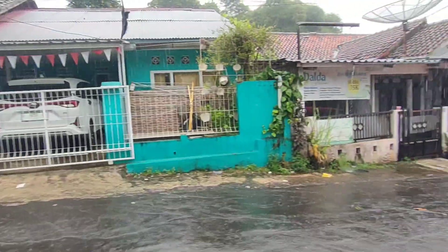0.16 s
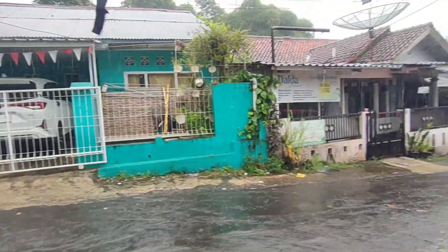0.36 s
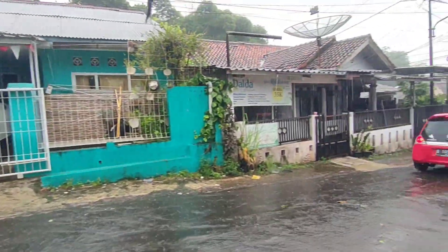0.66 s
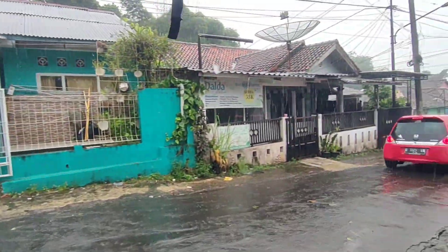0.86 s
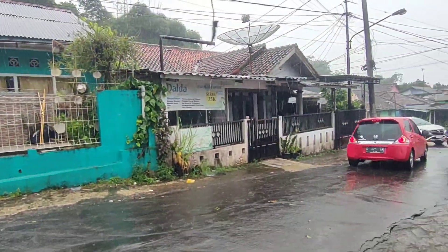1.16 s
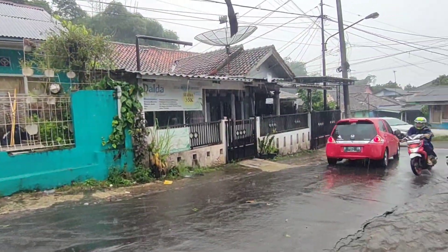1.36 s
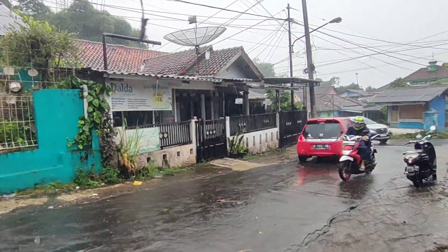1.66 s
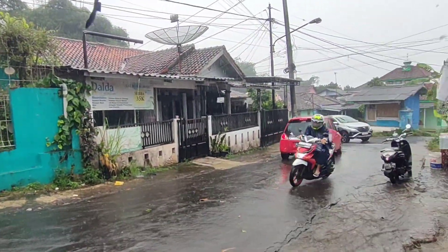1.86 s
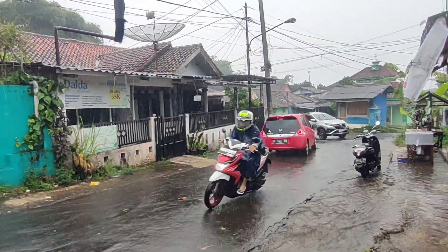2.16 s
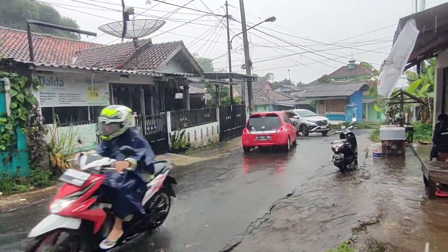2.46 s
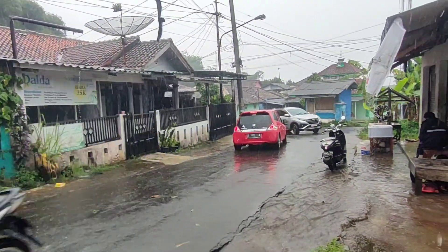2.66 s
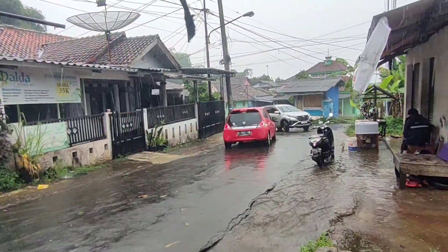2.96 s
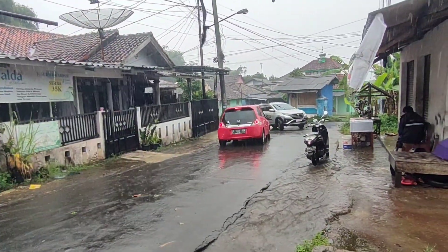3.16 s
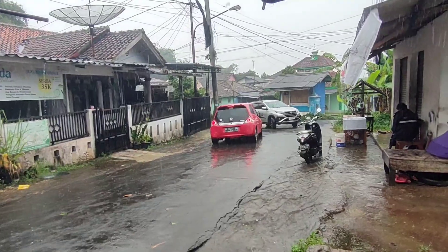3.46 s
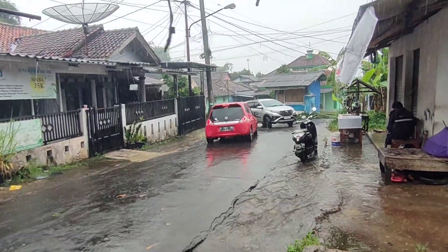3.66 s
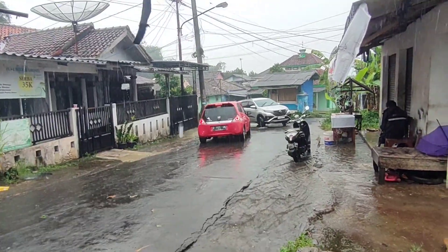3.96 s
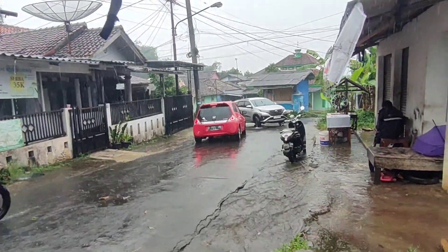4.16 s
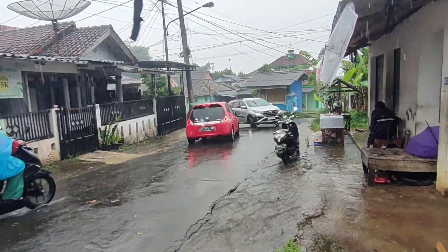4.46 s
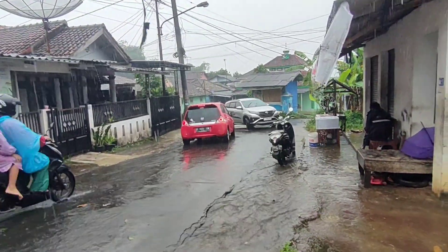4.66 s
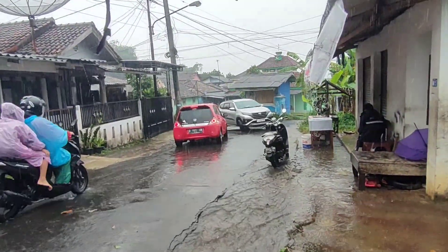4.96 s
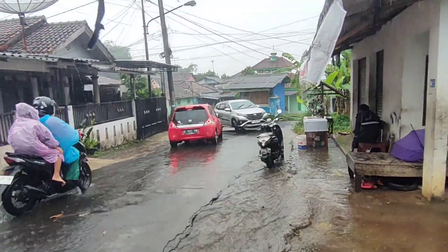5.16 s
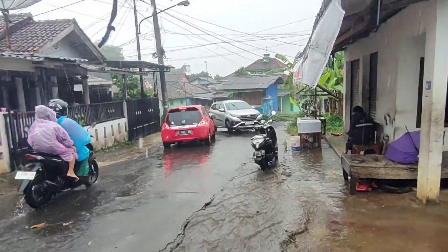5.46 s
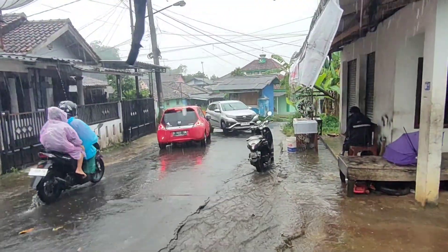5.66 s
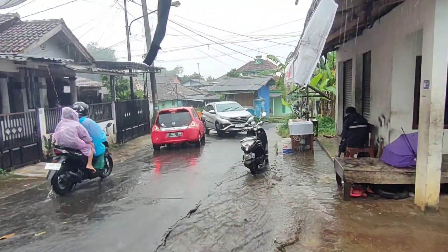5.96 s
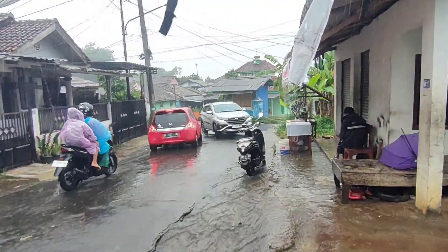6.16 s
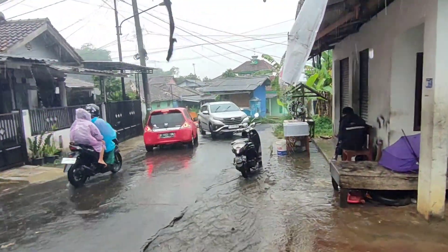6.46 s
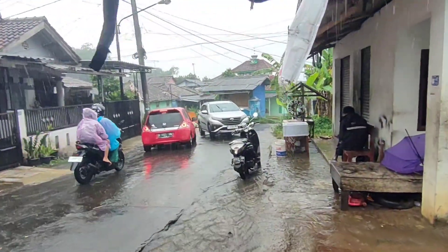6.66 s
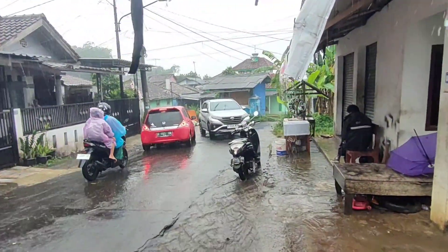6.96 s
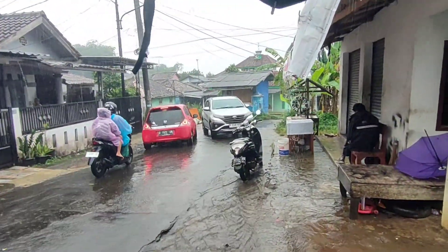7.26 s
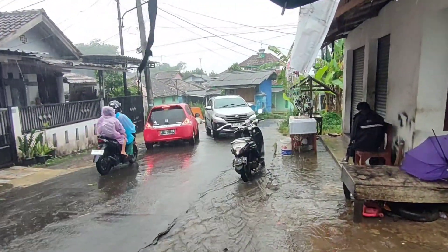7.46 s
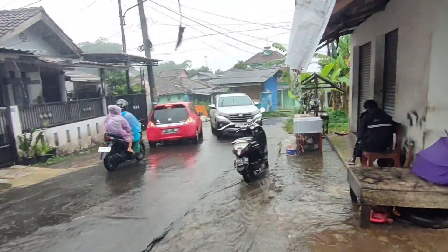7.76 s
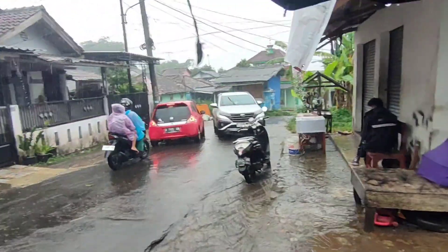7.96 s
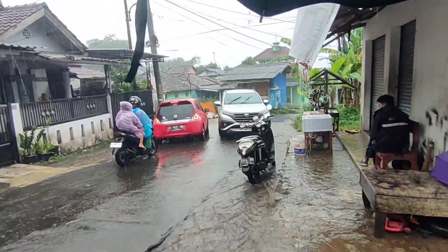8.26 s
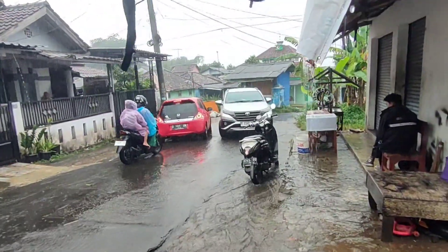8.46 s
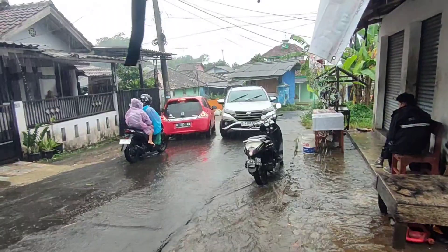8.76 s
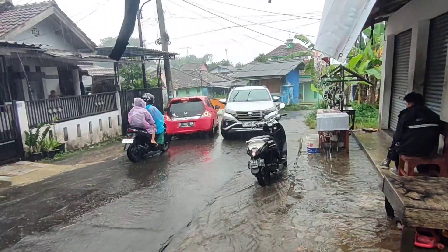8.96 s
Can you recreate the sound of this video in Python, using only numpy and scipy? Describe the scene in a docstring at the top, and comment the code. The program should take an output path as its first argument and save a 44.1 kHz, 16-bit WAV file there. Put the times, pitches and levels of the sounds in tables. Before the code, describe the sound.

Rain fills a wet village road, heard on a phone from a sheltered porch; the hiss is patchy, with clumped light drops, and a few plinks hit the awning around 0.3-0.6 s. From about 1 s a scooter's low, uneven putter grows with wet tyre spray, passing closest near 2.9 s with a brief ringing boom. Its exhaust drops in pitch and dies by 4.5 s, while a second engine idles steadily, weakening to almost nothing by 9 s. Rain is strongest near 3 s, then eases. Small birds warble from 3.1 to 4.3 s, chirp strongly at 4.4-4.8 s, then more sparsely, at 6.5 and 8.5 s, with a faint trailing whistle at 8.9 s. Very thin brake squeaks come near 4.3, 6.2 and 6.5 s. Large drops thud overhead from 4.8 to 6.2 s and knock or plink again at 7.6-8 s. Short porch reverberation; right side muffled.

```python
"""Rain on a wet village road, heard from a porch: a scooter speeds up, passes close by, slows and leaves, tyres
spray; a second one idles on, fading. Exhausts are sine multiples of a firing rate, tyres and rain wash are hiss.
Drops knock on the awning overhead as pitched blows; small birds chirp and warble under the porch roof as
gliding partials; a brake squeaks thinly as swelling tones.
The phone has two ports; the right one is shaded and hears little treble."""
import sys
import numpy as np
from scipy import signal
from scipy.fft import rfft, irfft, next_fast_len
from scipy.io import wavfile
from scipy.ndimage import uniform_filter1d, minimum_filter1d, map_coordinates

SR = 44100
rng = np.random.default_rng(int(sys.argv[2]) if len(sys.argv) > 2 else 0)


def materialize(psi):
    """Save the field psi as 16-bit PCM at rate SR to the path in sys.argv[1].

    A 1-D psi becomes a single channel; in a 2-D psi each row is a channel.
    """
    bounded = np.clip(np.atleast_2d(psi).T, -1, 1)
    quanta = np.round(bounded * 32767).astype(np.int16)
    wavfile.write(sys.argv[1], SR, quanta)


def elevation(decibels):
    """Turn decibel levels (scalar or array-like) into linear amplitude ratios."""
    levels = np.asarray(decibels, float)
    return 10 ** (levels / 20)


N = 401310
T = np.arange(N) / SR
SIDES = np.array([[1], [-1]])  # left port, right port

# sound common to both ports: (frequency [Hz], correlation [0 to 1])
PORT_LIKENESS = [(130, 1), (300, 0.54), (900, 0.15)]
# treble kept from the right port: (frequency [Hz], loss [dB])
RIGHT_PORT_SHADE = [(550, 1.5), (1400, 13.5), (3300, 8.5), (7000, 114), (10000, 63.5), (15000, 42.5)]
TOP_HZ = 15850
PORCH_T60_S = 0.43

# colour of the rain wash and of the drop splats: (frequency [Hz], spectral level [dB])
RAIN_COLOUR = [(30, -9.5), (98, 1), (295, -5.5), (666, -5), (1010, -22.5), (1280, -14.5), (2900, -36),
               (4080, -38), (6550, -26), (8600, -42), (11500, -51), (14800, -28)]
WASH_DB = -46.5  # before the shower strength
# strength of the wash and the patter, rising and then easing: (time [s], level [dB])
SHOWER = [(0, 8.5), (3, 12.5), (6.5, 4.5), (9.1, 3)]
# big drops on the awning: (time [s], blow level before the awning rings [dB], blow pitch [Hz])
BIG_DROPS = [(0.323, -28.5, 1520), (0.473, -25, 1496), (0.534, -37.5, 706), (0.572, -31, 1200),
             (4.841, -21.5, 260.6), (4.926, -23.5, 260.2), (5.348, -19.5, 313.4), (5.463, -23.5, 389),
             (5.625, -26, 1190), (5.664, -25.5, 353), (5.792, -21, 352), (6.212, -28.5, 574),
             (7.609, -23.5, 1948), (7.735, -30, 594), (7.81, -37.5, 1320), (8.027, -23.5, 1240)]
# ringing modes of the awning: (frequency [Hz], level [dB], decay by 60 dB [s])
AWNING_MODES = [(189, -6.5, 0.083), (619, -4, 0.016), (1342, -12.5, 0.029), (1927, -17, 0.048),
                (2510, -26.5, 0.083)]

# single chirps: (start [s], swell [s], fade [s], peak level [dB],
#                 second partial near the peak [Hz], drift after the peak [Hz/s])
CHIRPS = [(3.544, 0.0095, 0.044, -15, 6910, -1500), (4.345, 0.055, 0.022, -9, 6652, 1491),
          (4.512, 0.024, 0.064, -12, 6733, 4189), (4.986, .012, 0.022, -26.5, 6900, -5000),
          (5.195, 0.091, 0.082, -24, 5940, 7005), (6.022, 0.015, 0.019, -30.5, 6304, -500),
          (6.044, 0.0075, 0.027, -34.5, 7050, -4000), (6.541, 0.056, 0.016, -12.5, 6648, -100),
          (6.859, 0.037, 0.0203, -21, 6780, -2000), (7.05, 0.09, 0.034, -31, 6090, 474.5),
          (8.545, 0.043, 0.11, -17, 6818, -500), (8.911, 0.027, 0.69, -29, 6286, 1604)]
# notes drawn point by point, one list each, warbles and one steep falling chirp:
# (time [s], second partial [Hz], level [dB])
DRAWN_NOTES = [
    [(3.06, 6560, -29), (3.165, 6790, -28), (3.225, 6780, -19.5), (3.24, 7130, -23.5), (3.31, 7150, -22),
     (3.36, 6500, -19)],
    [(3.408, 8020, -31), (3.425, 7400, -14.5), (3.447, 6880, -21), (3.472, 6450, -17)],
    [(3.6, 6510, -21.5), (3.618, 6930, -11.5), (3.632, 6760, -18), (3.675, 6600, -21), (3.692, 7250, -10.5),
     (3.716, 7460, -27), (3.752, 6670, -10.5), (3.775, 5766, -22.5)],
    [(4.1, 7000, -28), (4.148, 6350, -20), (4.175, 7080, -15), (4.204, 6800, -17.5), (4.252, 6220, -11),
     (4.29, 6250, -26)],
    [(4.703, 7630, -31.5), (4.716, 6950, -16), (4.745, 7180, -17), (4.764, 7020, -13), (4.796, 6800, -14.5),
     (4.83, 6600, -51.5)],
]
# strength of any whistle partial by its pitch: (frequency [Hz], level [dB])
WHISTLE_COLOUR = [(3450, -9), (7200, 0), (8000, -38), (9000, -18), (10500, -23), (12000, -46),
                  (14000, -24.5)]
SWELL_DB, FADE_DB = 16, 10.5  # a chirp's level below its peak at the start and at the end
# stronger chirps start higher and drop in during the swell
SCOOP_HZ_PER_DB, SCOOP_FROM_DB, SCOOP_SHARE = 30, -41, 0.25
BRIGHTER_DB_PER_DB, PLAIN_DB = 0.45, -20.5  # louder notes favour the upper partials

# brake squeaks: (start [s], peak level [dB], swell time [s])
SQUEAKS = [(4.339, -25.5, 0.011), (6.203, -22, 0.026), (6.52, -32, 0.015)]
SQUEAK_HZ = 9085

# the first scooter's exhaust as it slows and leaves: (time [s], firing rate [Hz], level [dB])
LEAVING = [(3.002, 46.27, -24.5), (3.598, 40.96, -37.5), (4.248, 33.57, -35), (4.553, 30.3, -54)]

# exhaust as heard, a scooter passes, then a second one idles on near 46 Hz:
# (time [s], firing rate [Hz], level [dB])
ENGINES = [(0.6, 32, -50), (1.338, 43.24, -29.5), (1.54, 45.65, -31), (2.33, 45.42, -25.5),
           (3.198, 46.06, -25), (4.25, 47.1, -30.5), (4.7, 48.6, -35), (4.871, 46.67, -41.5),
           (7.1, 45.47, -45.5), (9.1, 45.4, -100)]
# relative strength of multiples 2 to 9 of the firing rate: (level [dB])
EXHAUST_DB = [6.5, -5, 1.5, 0.5, -1, -3.5, -7.5, -10]
# resonances near the pass, the casing rings, and a boom at the exhaust's third multiple:
# (frequency [Hz], width [Hz], relative level [dB]); in effect no wider than about 1100 Hz
PASS_RESONANCES = [(867.3, 16.5, 10), (959, 26, 7), (1930, 3100, -10.5), (140, 26, 11), (564, 31, -1.5)]
# the resonances are heard only near the closest point of the pass
PASSES_S, NEAR_S, RESONANCE_DB, RESONANCE_DB_PER_DOUBLING = 2.89, 0.28, -22.5, 12.5
# colour of the tyre spray: (frequency [Hz], spectral level [dB])
SPRAY_COLOUR = [(842, -16), (2000, -13), (3700, -34), (6520, -11), (8360, -28.5), (16000, -32)]
# tyre spray as heard: (time [s], level [dB])
TYRES = [(1.0, -47), (1.54, -34), (2.33, -24.5), (2.85, -23), (3.3, -33), (4.9, -59.5)]


def unit_rms(x):
    """Scale to an rms of 1, over both ports together."""
    return x / np.sqrt(np.mean(x ** 2))


def over_hz(table, hz):
    """Read (frequency, value) points on a log axis."""
    f, v = np.transpose(table)
    return np.interp(np.log(hz + 1), np.log(f), v)


def walk(rate, count=1):
    """Random wander in straight lines between `rate` knots per second, spread near 1."""
    knots = rng.standard_normal((count, int(N / SR * rate) + 2))
    return np.array([np.interp(T * rate, np.arange(len(k)), k) for k in knots])


def ring(x, hz, t60):
    """One mode, struck by x and decaying exponentially."""
    p = np.exp(2j * np.pi * hz / SR - np.log(1000) / (max(t60, .002) * SR))
    return signal.lfilter([0, p.imag], [1, -2 * p.real, abs(p) ** 2], x)


def hiss(colour, patchy_db, patch_hz, patch_s, per_s):
    """Two-port noise made of splashes: each strikes a range of pitch at once and fades; the bass is shared."""
    hz = np.fft.rfftfreq(512, 1 / SR)
    frames = N // 128 + 5
    u = rng.random((2, 33, frames))
    strikes = -np.log(1 - u[0]) * (u[1] < per_s * 128 / SR)
    fading = signal.lfilter([1], [1, -np.exp(-128 / SR / max(patch_s, .005))], strikes, axis=1)
    warp = 5.2 * np.log2(1 + hz / patch_hz)  # splashes widen with pitch
    at = np.meshgrid(warp, np.arange(frames), indexing="ij")
    splash = map_coordinates(fading[1:], at, order=1, mode="nearest")
    splash = splash + 0.12 * fading[0]  # some strike every pitch
    # the top hisses more evenly
    depth_db = patchy_db * (np.clip(hz / 900, .3, 1.3) / np.sqrt(1 + hz / 5000))[:, None]
    patches = elevation(depth_db * np.log2(0.27 + splash))
    noise = rng.standard_normal((2, len(hz), frames, 2)) @ np.array([1, 1j])
    mid, side = signal.istft(patches * noise, nperseg=512, noverlap=384)[1][:, :N]

    size = next_fast_len(N)
    hz = np.fft.rfftfreq(size, 1 / SR)
    like = np.clip(over_hz(PORT_LIKENESS, hz), 0, 1)
    pair = np.sqrt(1 + like) * rfft(mid, size) + SIDES * np.sqrt(1 - like) * rfft(side, size)
    return unit_rms(irfft(pair * elevation(over_hz(colour, hz)), size)[:, :N])


def porch(x, wet_db):
    """Walls and roof answer with a decaying haze, different at each port."""
    t = T[:int(.6 * SR)]
    tail = rng.standard_normal((2, len(t))) * np.exp(-np.log(1000) * t / PORCH_T60_S)
    tail *= t > .006  # the answer comes a little late
    tail = signal.lfilter([1], [1, -0.4], tail)  # duller than the direct sound
    tail /= np.sqrt(np.sum(tail ** 2, axis=1, keepdims=True))
    return x + elevation(wet_db) * signal.fftconvolve(x, tail, axes=1)[:, :N]


def knocks(drops, pan_db, splat_db, cycles_to_peak):
    """Each drop is a short pitched blow (thud if low, plink if high) ringing the awning, and a bright splat."""
    blows, splats = np.zeros((2, 2, N + SR))
    t = T[:1500]
    fade = np.exp(-t / 0.0052)
    for (s, db, hz), pan, cycles in zip(drops, pan_db, cycles_to_peak):
        i = int(s * SR)
        gain = elevation(db + SIDES * pan / 2)
        rise = t * hz / cycles
        blows[:, i:i + len(t)] += gain * rise * np.exp(1 - rise) * np.sin(2 * np.pi * hz * t)
        splats[:, i:i + len(t)] += gain * fade * hz / 1000  # high blows splash more
    size = next_fast_len(N)
    hz = np.fft.rfftfreq(size, 1 / SR)
    colour = elevation(over_hz(RAIN_COLOUR, hz) + splat_db) * (hz > 1000)
    splats = irfft(rfft(splats[:, :N] * rng.standard_normal(N), size) * colour, size)[:, :N]
    blows = uniform_filter1d(blows[:, :N], size=5)  # water cushions the edge
    rung = sum(elevation(db) * np.pi * f / SR * ring(blows, f, t60) for f, db, t60 in AWNING_MODES)
    return splats + blows + rung


def wash():
    """Far rain on road and roofs: countless splashes merge into a patchy hiss."""
    return elevation(WASH_DB) * hiss(RAIN_COLOUR, patchy_db=9.0, patch_hz=380.7, patch_s=0.034, per_s=22)


def patter():
    """Small drops come in clumps, each a faint knock with its own pitch and place."""
    clump, loud, pitch, place, delay, slow = rng.random((2400, 6)).T
    spills = rng.random(220) * N / SR
    when = spills[(clump * len(spills)).astype(int)] - .08 * np.log(1 - delay)
    hz = 350 * 2 ** (3 * pitch)
    drops = np.c_[when % (N / SR), -36 - 22 * loud ** .4, hz]
    cycles = 0.35 + slow ** 5 * hz / 700
    return porch(knocks(drops, pan_db=20 * (place - .5), splat_db=1.5, cycles_to_peak=cycles), wet_db=-10)


def awning_drops():
    """Big drops close overhead strike the awning, slightly louder at the left port."""
    count = len(BIG_DROPS)
    blows = knocks(BIG_DROPS, pan_db=np.full(count, 2.5), splat_db=14, cycles_to_peak=np.full(count, .33))
    return porch(blows, wet_db=-4.0)


def rain():
    """Wash and patter follow the shower's strength; the big drops keep their own levels."""
    strength = elevation(np.interp(T, *np.transpose(SHOWER)))
    return strength * (wash() + patter()) + awning_drops()


def chirp(start, swell, fade, db, hz, drift):
    """Pitch and level points of one chirp: it scoops down while swelling, then drifts and fades."""
    t = np.r_[np.linspace(0, swell, num=8), swell + fade]
    scoop = SCOOP_HZ_PER_DB * max(db - SCOOP_FROM_DB, 0) * np.exp(-t / (SCOOP_SHARE * swell))
    after = np.clip(t - swell, 0, None)
    level_db = db - SWELL_DB * np.clip(1 - t / swell, 0, 1) ** 2 - FADE_DB * after / fade
    return np.c_[start + t, hz + scoop + drift * after, level_db]


def birds():
    """Gliding, husky whistle: four partials, each wavering, and a breathy band between the lowest two."""
    hz, level_db = np.full(N, 6500.), np.full(N, -120.)  # silent between notes
    for note in DRAWN_NOTES + [chirp(*row) for row in CHIRPS]:
        s, f, db = np.transpose(note)
        on = slice(int(s[0] * SR), int(s[-1] * SR))
        hz[on] = np.interp(T[on], s, f)
        level_db[on] = np.interp(T[on], s, db)
    husk = 1 + 0.36 * walk(500)[0]
    waver_db = 2.2 * walk(60, count=4)
    phase = np.pi * np.cumsum(hz * (1 + 0.011 * walk(150)[0])) / SR  # of the lowest partial, at hz / 2
    tilt_db = BRIGHTER_DB_PER_DB * (np.clip(level_db, -40, 0) - PLAIN_DB)
    partials = np.zeros(N)
    for k in (1, 2, 3, 4):
        partial_db = over_hz(WHISTLE_COLOUR, k * hz / 2) + (k - 1.0) * tilt_db + waver_db[k - 1]
        partials += elevation(partial_db) * np.sin(k * phase)
    breath = elevation(-29) * walk(900)[0] * np.sin(3 * phase / 2)
    whistle = uniform_filter1d(elevation(level_db), size=160) * (husk * partials + breath)
    return porch(np.tile(whistle, (2, 1)), wet_db=-6.0)


def brake_squeaks():
    """Thin, nearly steady tones that swell and fade."""
    swells = np.zeros(N)
    for s, db, swell in SQUEAKS:
        t = np.clip(T - s, 0, None) / swell
        swells += elevation(db) * t * np.exp(1 - t)
    tone = np.sin(2 * np.pi * SQUEAK_HZ * np.cumsum(1 + .002 * walk(80)[0]) / SR)
    return porch(np.tile(swells * tone, (2, 1)), wet_db=-20)


def leaving_exhaust():
    """The first scooter slows and leaves: second and third multiples of its sinking firing rate die away."""
    s, hz, db = np.transpose(LEAVING)
    level_db = np.interp(T, s, db, left=-99, right=-99) + 0.99 * walk(0.7)[0]
    gain = uniform_filter1d(elevation(level_db), size=4000)
    phase = 2 * np.pi * np.cumsum(np.interp(T, s, hz)) / SR
    return gain * (np.sin(2 * phase) + elevation(-1.5) * np.sin(3 * phase))


def tyre_spray():
    """Wet tyres throw up water: finely patched hiss that swells and falls with the pass."""
    spray = hiss(SPRAY_COLOUR, patchy_db=1.5, patch_hz=650, patch_s=0.0042, per_s=61)
    return spray * elevation(np.interp(T, *np.transpose(TYRES)))


def pass_resonances(cycle):
    """Each firing, a knock and a gas rush, rings the casing and a low boom, loudest at the closest point."""
    fired = np.flatnonzero(np.diff(np.floor(cycle)))
    knock = 0.097 * rng.standard_normal((2, N)) * np.exp(-(cycle % 1) / .5)  # gas rush after each firing
    knock[:, fired] += elevation(0.79 * rng.standard_normal(len(fired)))
    knock = signal.oaconvolve(knock, np.hanning(16)[None], axes=1)[:, :N]  # soften the blow
    rung = sum(elevation(db) * w * ring(knock, f, np.log(1000) / np.pi / w) for f, w, db in PASS_RESONANCES)
    distance = np.hypot(1, (T - PASSES_S) / NEAR_S)  # 1 at the closest point
    return unit_rms(rung) * elevation(RESONANCE_DB - RESONANCE_DB_PER_DOUBLING * np.log2(distance))


def exhaust(cycle, pipe_db):
    """The pipe sounds low multiples of the firing rate, each wavering in level."""
    duller_db = 0.05 * (pipe_db - pipe_db.max())  # per multiple: the fainter, the duller
    wobble_db = 3.37 * walk(14, count=len(EXHAUST_DB))
    start = rng.random(len(EXHAUST_DB))
    pipe = np.zeros(N)
    for k, db in enumerate(EXHAUST_DB):
        gain = elevation(db + wobble_db[k] + k * duller_db)
        pipe += gain * np.sin(2 * np.pi * ((k + 2) * cycle + start[k]))
    return unit_rms(pipe) * elevation(pipe_db)


def scooters():
    """Slightly uneven single-cylinder firings, one curve for the scooter that passes and the one idling on."""
    s, *columns = np.transpose(ENGINES)
    hz, pipe_db = (np.interp(T, s, c) for c in columns)
    cycle = np.cumsum(hz * (1 + 0.00386 * walk(12)[0])) / SR
    return exhaust(cycle, pipe_db) + pass_resonances(cycle) + tyre_spray()


def scene():
    """Everything in front of the two ports."""
    return rain() + birds() + brake_squeaks() + leaving_exhaust() + scooters()


def suppress(x, strength, least_db):
    """Noise suppressor: above the bass, a band is turned down when near its own quiet level."""
    hz, _, spec = signal.stft(x, SR, nperseg=1024, noverlap=768)
    power = uniform_filter1d(uniform_filter1d(np.abs(spec) ** 2, size=5, axis=1), size=5, axis=2)
    quiet = uniform_filter1d(minimum_filter1d(power, size=120, axis=2), size=120, axis=2)
    above_bass = np.clip(hz / 1200, 0, 1)[:, None]
    power_gain = np.maximum(1 - strength * quiet * above_bass / (power + 1e-18), elevation(2 * least_db))
    return signal.istft(spec * np.sqrt(power_gain), nperseg=1024, noverlap=768)[1][:, :N]


def top_cut(x):
    """Nothing passes above the cut-off."""
    return signal.sosfilt(signal.butter(12, 16390, fs=SR, output="sos"), x)


def record(dry):
    """Phone: peaks rounded, right port shaded, deepest bass and top cut, then the noise suppressor."""
    size = next_fast_len(N)
    hz = np.fft.rfftfreq(size, 1 / SR)
    ports = np.array([np.ones(len(hz)), elevation(-over_hz(RIGHT_PORT_SHADE, hz))])
    ports = ports * (hz < TOP_HZ) * np.clip(hz / 55, 0, 1) ** 2
    heard = irfft(rfft(np.tanh(dry), size) * ports, size)[:, :N]
    finished = suppress(heard, strength=1.44, least_db=-39.5)
    return top_cut(finished)


dry = scene()
out = record(dry)
materialize(out)
```